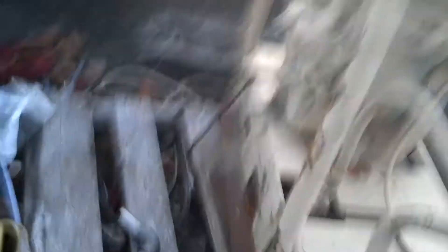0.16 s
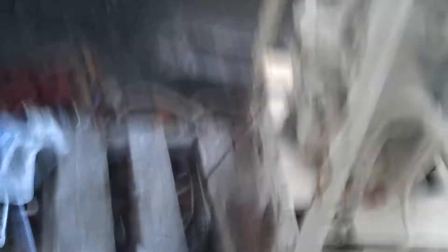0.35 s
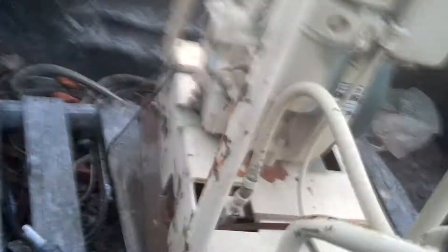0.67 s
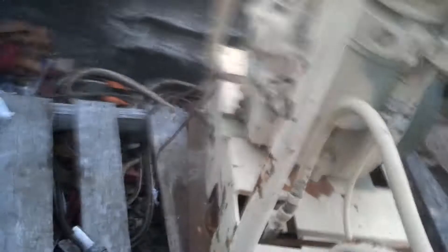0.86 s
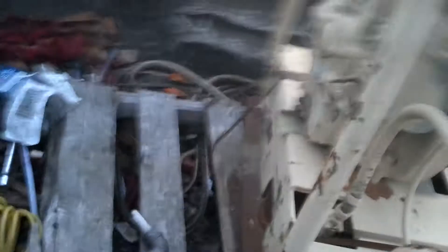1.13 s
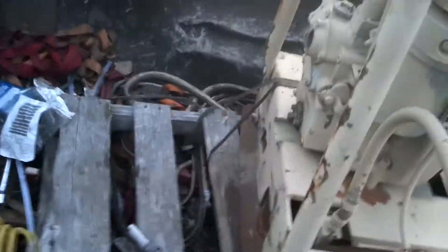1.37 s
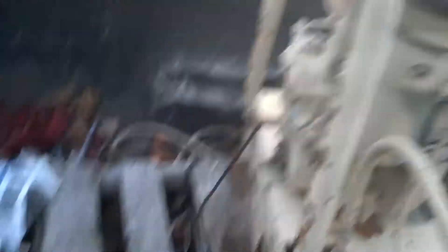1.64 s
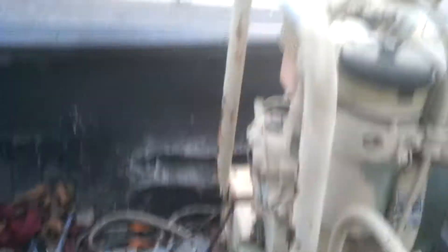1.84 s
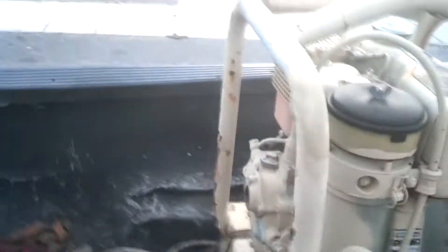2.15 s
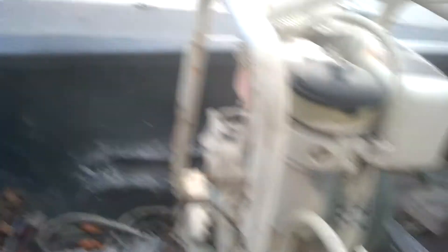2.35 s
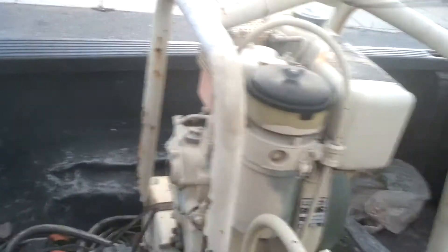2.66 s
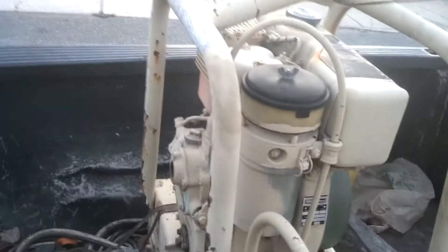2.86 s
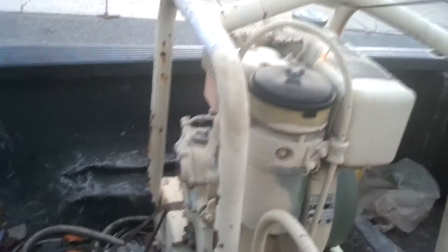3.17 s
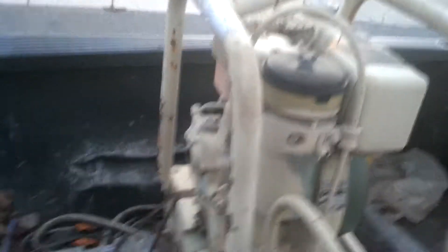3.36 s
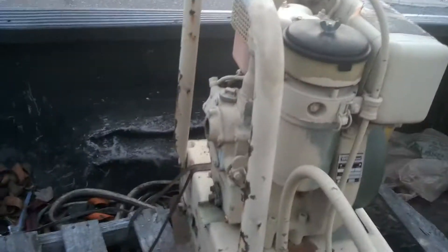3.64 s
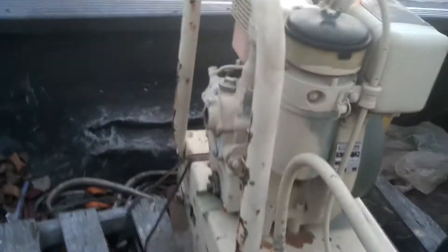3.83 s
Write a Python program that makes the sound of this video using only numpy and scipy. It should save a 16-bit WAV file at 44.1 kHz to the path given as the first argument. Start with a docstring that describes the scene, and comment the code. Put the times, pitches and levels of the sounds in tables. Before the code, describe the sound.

A small single-cylinder diesel is cranked in a truck bed, chuffing about eight times a second over gear whirr and rattle. A loose part clangs at 0.3 s; a click at 0.9 s abruptly lowers the level, which creeps back. Seven hard, pinging knocks run from 1.25 to 2 s, then softer puffs and ticks. From 2.7 s knocks return, quickening to about fourteen per second by 4 s. Close, dry, wide stereo.

```python
"""A small single-cylinder diesel starts in a truck bed: slow chuffs over gear whirr and rattle, one loose-part clang,
a click with a drop in level, seven hard knocks, a soft spell, then knocks again as it speeds up.
Every cycle adds a piston slap, exhaust puff, intake gulp and valve ticks.
Noise bursts and damped modes make the blows, coloured noise the whirr and scratchy treble.
Two microphones pick it up; the stereo is widened."""
import sys
import numpy as np
from scipy import signal
from scipy.fft import rfft, irfft, next_fast_len
from scipy.io import wavfile
from scipy.ndimage import map_coordinates

SR = 44100
rng = np.random.default_rng(int(sys.argv[2]) if len(sys.argv) > 2 else 0)


def store_pcm(level_fs):
    """Save levels as 16-bit WAV."""
    pcm = np.round(np.clip(level_fs, -1, 1) * 32767).astype(np.int16)
    wavfile.write(sys.argv[1], SR, np.atleast_2d(pcm).T)


N = 176400
T = np.arange(SR // 2) / SR  # time base of one blow [s]

# Unfired compression strokes: (time [s], level [dB])
CRANK_STROKES = [(.01, -19), (0.131, -19.5), (.251, -17.5), (.378, -23.5), (.506, -21.5), (.643, -20),
                 (0.781, -20), (.932, -23.5), (1.086, -29)]
# Firings: (time [s], thud level [dB], ping level [dB])
FIRINGS = [(1.246, -9.5, -15.5), (1.392, -10.5, -20.5), (1.526, -10, -17.5), (1.648, -8.5, -16),
           (1.762, -8, -15), (1.869, -10.5, -17), (1.969, -10.5, -18), (2.068, -25, -45),
           (2.162, -21.5, -45), (2.262, -21.5, -43), (2.357, -19.5, -39), (2.453, -19, -41),
           (2.548, -17, -40), (2.643, -17, -40), (2.735, -10.5, -27.5), (2.831, -17, -33.5),
           (2.919, -12.5, -26.5), (3.009, -13, -30.5), (3.096, -12.5, -29), (3.183, -15, -35),
           (3.268, -11.5, -32), (3.351, -14.5, -23), (3.433, -15, -33.5), (3.512, -10, -21.5),
           (3.589, -11.5, -20.5), (3.663, -10, -22), (3.735, -9, -20), (3.805, -9.5, -20),
           (3.873, -8.5, -20), (3.94, -9, -19)]
# Course of levels: (time [s], machinery level [dB], gas pulse level [dB])
LEVELS = [(0, 4.5, 1.5), (0.877, 5.5, -0.5), (1.2, -7, -15.5), (1.4, -8.5, -8.5), (2.05, -2.5, -5),
          (2.6, 2, 0), (3.25, 6.5, 5), (3.45, 0, 0), (4, 1, 3.5)]
# Scratchy treble: (time [s], level [dB])
SIZZLE_LEVELS = [(.63, -67), (.66, -33.5), (.73, -67), (.89, -38.5), (.95, -72), (2.1, -55.5), (3, -41.5),
                 (4, -44)]
# Sharp clicks: (time [s], level [dB])
CLICKS = [(.883, -13), (2.921, -22), (3.353, -20)]
# Drive gear modes under compression: (frequency [Hz], level [dB], t60 [s])
GEAR_MODES = [(1041, -3, 0.2), (1472, 1, 0.13), (1822, -2, 0.061)]
# Exhaust pulse modes: (frequency [Hz], level [dB], t60 [s])
EXHAUST_MODES = [(98, -7.5, 0.083), (172, -2, 0.028), (338.3, -7.5, 0.034)]
# Intake pulse modes: (frequency [Hz], level [dB], t60 [s])
INTAKE_MODES = [(168, .5, 0.16), (343, 5.5, 0.033), (450, -5.5, 0.059)]
# Loose part modes: (frequency [Hz], level [dB], t60 [s])
LOOSE_MODES = [(1670, 4, 0.052), (2320, 5, 0.05)]
# Engine block and frame modes: (frequency [Hz], level [dB], t60 [s])
BLOCK_MODES = [(790, 7, 0.135), (1040, 2, 0.16), (1331, -5.5, 0.19), (1472, -.5, 0.07), (1719, -14.5, 0.65),
               (1868, 0, 0.1)]
# Cylinder and head modes under a hard knock: (frequency [Hz], level [dB], t60 [s])
HEAD_MODES = [(2090, 1, 0.05), (2200, -5, 0.047), (3683, -2, 0.05), (4290, 1.5, 0.06), (4553, -2.5, 0.06)]
# Noise spectra, relative: (frequency [Hz], density [dB per Hz])
WHIRR_SPECTRUM = [(25, -17), (90, 16), (280, 13), (650, 0), (1040, 14), (1500, -2), (2600, 4), (4400, -4),
                  (6500, -14.5), (10000, -16), (15500, -37)]
TICK_SPECTRUM = [(200, 12), (600, 1), (1200, 1), (2500, -15), (4000, -2.5), (6000, -15.5), (15000, -34)]
CHUFF_SPECTRUM = [(200, 4), (700, -0.5), (1050, -5.5), (1270, 13.5), (1480, 1), (1850, 3), (2100, -1),
                  (5000, -10), (15000, -62)]
PING_SPECTRUM = [(600, -18), (1500, -22), (2200, -1), (3100, -8.5), (4400, -2.5), (5300, -9.5),
                 (7500, -21.5), (10000, -16.5), (15500, -59.5)]
HISS_SPECTRUM = [(4000, 7), (10000, 10), (14000, -2.5)]
THUD_SPECTRUM = [(100, -2), (560, -13), (740, -4.5), (1100, 2), (1500, -5.5), (2150, -1.5), (2800, -12.5),
                 (6000, -26.5)]
# Leak to the far microphone: (frequency [Hz], amplitude share [1])
FAR_LEAK = [(100, 0.47), (420, 0.67), (800, 0.15), (1300, 0.012), (2100, 0.045), (4000, 0.0031)]

# Share of a cycle after top of compression
SLAP_SHARE, EXHAUST_SHARE, MID_SHARE, INLET_SHUT_SHARE = .21, 0.2008, .5, .815
PIPE_DELAY_S = 0.00787
SLOW_DB_PER_OCTAVE = 3.5  # boost per doubling of cycle length
REPEAT_SHARE = 0.26  # power share of a burst common to all blows
MODE_DETUNE = .003  # relative, standard deviation
RATTLE_PER_S, RATTLE_T60_S, RATTLE_DB = 110, 0.011, -34
CLANG_S, CLANG_HZ, CLANG_SLIDE_HZ = .282, 457, 120
CLANG_SETTLE_S, CLANG_T60_S = .006, .25  # settle: time constant
CLANG_DB, NOTE_DB = -21.5, -13
CLICK_T60_S = .005
DIP_DB, DIP_S = 14.5, 0.32
BED_T60_S, BED_DB, BED_LOW_HZ = 0.015, -12, 486
WIDEN_SHARE, WIDEN_S = .97, 16 / 44100
LOW_CUT_HZ, TOP_HZ = 54, 15700


def amp(db):
    """Decibels to amplitude."""
    return 10 ** (np.asarray(db) / 20)


def unit(x):
    """Scale to rms 1."""
    return x / np.sqrt(np.mean(x ** 2) + 1e-20)


def along(points, hz):
    """Interpolate (frequency [Hz], value) points on a log axis."""
    f, v = np.transpose(points)
    return np.interp(np.log(hz + 1), np.log(f + 1), v)


def filtered(x, response):
    """Apply a complex frequency response."""
    n = x.shape[-1]
    m = next_fast_len(n + SR // 2)
    spectrum = rfft(x, m) * response(np.fft.rfftfreq(m, 1 / SR))
    return irfft(spectrum, m)[..., :n]


def high_pass(hz, corner_hz):
    """Response of a second-order low cut."""
    s = 1j * hz / corner_hz
    return s * s / (1 + np.sqrt(2) * s + s * s)


def noise(spectrum, shape):
    """Coloured noise of rms 1."""
    white = rng.standard_normal(shape)
    return unit(filtered(white, lambda hz: amp(along(spectrum, hz))))


def fade(t60_s):
    """Exponential decay, 60 dB in t60_s."""
    return np.exp(-np.log(1000) * T / t60_s)


def rise(attack_s):
    """Exponential onset with time constant attack_s."""
    return 1 - np.exp(-T / attack_s)


def bursts(spectrum, count, attack_s, t60_s, tail_db, tail_t60_s):
    """Dense ringing, one row per blow: partly common noise, fast plus slow decay."""
    z = noise(spectrum, (count + 1, len(T)))
    mixed = np.sqrt(REPEAT_SHARE) * z[0] + np.sqrt(1 - REPEAT_SHARE) * z[1:]
    decay = fade(t60_s) + amp(tail_db) * fade(tail_t60_s)
    return mixed * rise(attack_s) * decay


def rings(modes, count, attack_s, scatter_db, detune):
    """Damped modes, one row per blow, with random level and pitch scatter."""
    out = 0
    for k, (hz, db, t60_s) in enumerate(modes):
        size, shift = rng.standard_normal((2, count, 1))
        level = (-1) ** k * amp(db + scatter_db * size)
        tone = np.sin(2 * np.pi * hz * (1 + detune * shift) * T)
        out = out + level * tone * fade(t60_s)
    return out * rise(attack_s) ** 2


def play(times_s, levels_db, sounds):
    """Place each sound at its time and level."""
    out = np.zeros(N + 2 * SR)
    for s, db, sound in zip(times_s, levels_db, sounds):
        out[max(0, round(s * SR)):][:len(T)] += amp(db) * sound
    return out[:N]


def levels(s):
    """Machinery and gas levels [dB] at the given times [s]."""
    at, metal, gas_db = np.transpose(LEVELS)
    return np.interp(s, at, metal), np.interp(s, at, gas_db)


def in_cycle(share):
    """Times [s] at which each cycle reaches this share of its length."""
    tops = np.array([row[0] for row in list(CRANK_STROKES) + list(FIRINGS)])
    lengths = np.diff(tops)
    return tops + share * np.append(lengths, lengths[-1])


def slow_boost_db():
    """Extra level of each cycle: longer cycles sound harder."""
    lengths = in_cycle(1) - in_cycle(0)
    return SLOW_DB_PER_OCTAVE * np.log2(lengths / lengths.mean())


def whirr():
    """Gears, fan and rattling fittings: coloured noise of unsteady level."""
    t = np.arange(N) / SR
    flutter_db = 2.8 * map_coordinates(rng.standard_normal(N // 100), [t * 130])  # 130 knots/s
    return amp(levels(t)[0] - 38.5 + flutter_db) * noise(WHIRR_SPECTRUM, N)


def rattle():
    """Loose fittings tick at random moments: sparse impulses excite a short noise burst."""
    hits = (rng.random(N) < RATTLE_PER_S / SR) * rng.standard_normal(N)
    tick = noise(TICK_SPECTRUM, len(T)) * fade(RATTLE_T60_S)
    level = amp(levels(np.arange(N) / SR)[0] + RATTLE_DB)
    return level * signal.fftconvolve(hits, tick)[:N]


def cranking():
    """Unfired compression chuffs; gears ring under load, their lowest mode again on the rebound."""
    s, db = np.transpose(CRANK_STROKES)
    chuff = bursts(CHUFF_SPECTRUM, len(s), attack_s=0.0074, t60_s=0.076, tail_db=-16, tail_t60_s=0.76)
    ring = rings(GEAR_MODES, len(s), attack_s=0.0015, scatter_db=1.5, detune=MODE_DETUNE)
    rebound = rings(GEAR_MODES[:1], len(s), attack_s=0.0013, scatter_db=6, detune=MODE_DETUNE)
    stroke = amp(1.5) * chuff + amp(-2.5) * ring
    return play(s, db, stroke) + play(in_cycle(SLAP_SHARE), db, amp(-3) * rebound)


def slaps():
    """The piston rocks against the liner on its way down: a short noise burst."""
    s = in_cycle(SLAP_SHARE)
    slap = bursts(CHUFF_SPECTRUM, len(s), attack_s=0.00095, t60_s=0.017, tail_db=-21, tail_t60_s=0.076)
    return play(s, levels(s)[0] + slow_boost_db(), amp(-25) * slap)


def gas():
    """Per cycle, damped modes give one silencer puff and one air-filter gulp."""
    out, inward = in_cycle(EXHAUST_SHARE) + PIPE_DELAY_S, in_cycle(MID_SHARE)
    puff = rings(EXHAUST_MODES, len(out), attack_s=0.0034, scatter_db=-1.0, detune=0.0082)
    gulp = rings(INTAKE_MODES, len(inward), attack_s=0.0057, scatter_db=-0.5, detune=MODE_DETUNE)
    puffs = play(out, levels(out)[1] + slow_boost_db(), -amp(-6.0) * puff)
    return puffs + play(inward, levels(inward)[1], amp(-19.5) * gulp)


def valves():
    """The exhaust valve seats at mid-cycle, the inlet valve before the next compression."""
    shut, inlet = in_cycle(MID_SHARE), in_cycle(INLET_SHUT_SHARE)
    clack = bursts(TICK_SPECTRUM, len(shut), attack_s=0.0005, t60_s=0.031, tail_db=-15.0, tail_t60_s=0.43)
    tick = bursts(PING_SPECTRUM, len(inlet), attack_s=0.0025, t60_s=0.021, tail_db=-36, tail_t60_s=0.11)
    clacks = play(shut, levels(shut)[0] + slow_boost_db(), amp(-23.5) * clack)
    return clacks + play(inlet, levels(inlet)[0], amp(-25.5) * tick)


def clang():
    """A jolted loose part scrapes and clinks; its low note slides up into a clean ring."""
    pitch_hz = CLANG_HZ - CLANG_SLIDE_HZ * np.exp(-T / CLANG_SETTLE_S)
    tone = np.sin(2 * np.pi * np.cumsum(pitch_hz) / SR)
    note = tone * rise(CLANG_SETTLE_S) * fade(CLANG_T60_S)
    clink = rings(LOOSE_MODES, 1, attack_s=0.0013, scatter_db=-1, detune=0)[0]
    scrape = amp(3.5) * noise(TICK_SPECTRUM, len(T)) * fade(0.076)
    return play([CLANG_S, CLANG_S], [NOTE_DB, CLANG_DB], [note, clink + scrape])


def sizzle():
    """Scratchy treble: high noise of flickering level."""
    t = np.arange(N) / SR
    flicker_db = 4 * map_coordinates(rng.standard_normal(N // 100), [t * 60])  # 60 knots/s
    level_db = np.interp(t, *np.transpose(SIZZLE_LEVELS))
    return amp(level_db + flicker_db) * noise(HISS_SPECTRUM, N)


def clicks():
    """Sharp clicks: fast-decaying white noise."""
    s, db = np.transpose(CLICKS)
    return play(s, db, rng.standard_normal((len(s), len(T))) * fade(CLICK_T60_S))


def dip():
    """Gain that drops abruptly at the first click and creeps back linearly in dB."""
    since_s = np.arange(N) / SR - CLICKS[0][0]
    return amp(-DIP_DB * np.interp(since_s, [0, CLICK_T60_S, DIP_S], [0, 1, 0]))


def knocks():
    """Each firing cracks and thuds in the block; a hard one also pings in the cylinder head."""
    s, thud_db, ping_db = np.transpose(FIRINGS)
    crack = noise(THUD_SPECTRUM, (len(s), len(T))) * rise(0.0024) ** 2 * fade(0.011)
    thud = bursts(THUD_SPECTRUM, len(s), attack_s=0.0031, t60_s=.08, tail_db=-13, tail_t60_s=0.21)
    block = rings(BLOCK_MODES, len(s), attack_s=0.0028, scatter_db=1, detune=MODE_DETUNE)
    ping = bursts(PING_SPECTRUM, len(s), attack_s=0.0011, t60_s=.058, tail_db=-8, tail_t60_s=0.16)
    head = rings(HEAD_MODES, len(s), attack_s=0.00018, scatter_db=-1.5, detune=MODE_DETUNE)
    body = amp(2) * crack + amp(-5.5) * thud + amp(-14.5) * block
    return play(s, thud_db, body) + play(s, ping_db, amp(1.5) * ping + amp(-2.5) * head)


def bed(x):
    """Short truck-bed answer: decaying noise, thin in the bass, different at each microphone."""
    tail = rng.standard_normal((2, len(T))) * fade(BED_T60_S)
    tail = tail / np.linalg.norm(tail[0])
    answer = signal.fftconvolve(x[None], tail, axes=1)[:, :N]
    return filtered(answer, lambda hz: high_pass(hz, BED_LOW_HZ))


def scene():
    """One microphone faces the engine; the other gets mostly its bass, plus stray whirr."""
    engine = cranking() + knocks() + slaps() + valves() + gas()
    engine = engine + whirr() + rattle() + clang() + clicks() + sizzle()
    stray = filtered(whirr(), lambda hz: high_pass(hz, BED_LOW_HZ / 2))
    far = filtered(engine, lambda hz: along(FAR_LEAK, hz)) + amp(-2) * stray
    return dip() * (np.array([engine, far]) + amp(BED_DB) * bed(engine))


def record(dry):
    """Widen by subtracting a delayed copy of the opposite channel, then limit the band."""
    crossed = filtered(dry[::-1], lambda hz: np.exp(-2j * np.pi * hz * WIDEN_S))
    wide = dry - WIDEN_SHARE * crossed
    return filtered(wide, lambda hz: high_pass(hz, LOW_CUT_HZ) * (hz < TOP_HZ))


dry = scene()
out = record(dry)
store_pcm(out)
```